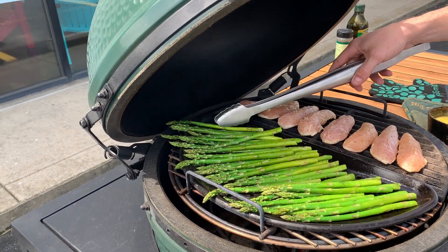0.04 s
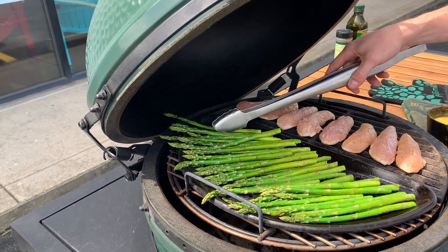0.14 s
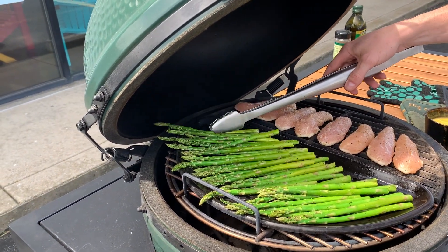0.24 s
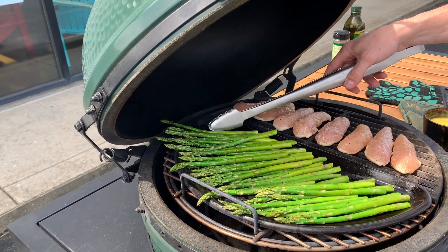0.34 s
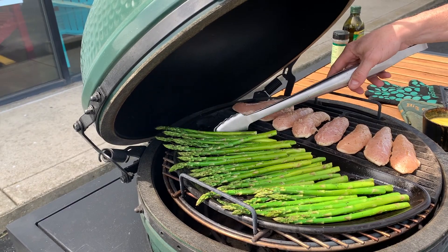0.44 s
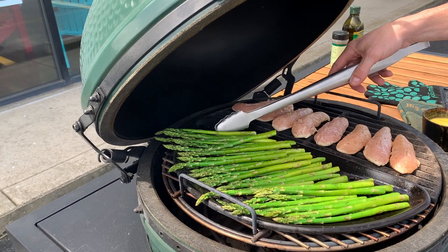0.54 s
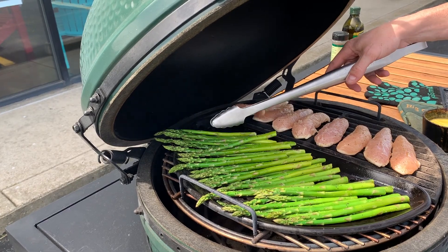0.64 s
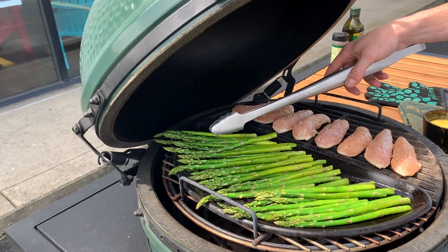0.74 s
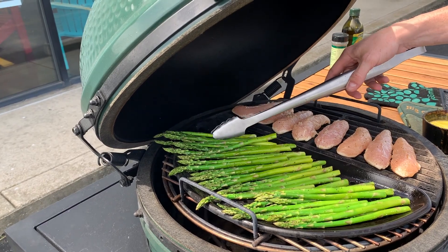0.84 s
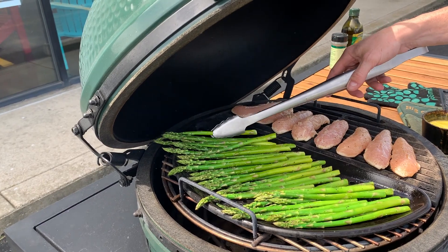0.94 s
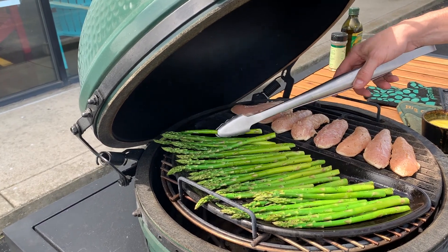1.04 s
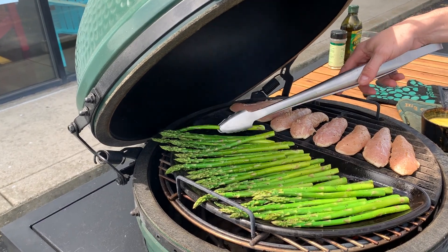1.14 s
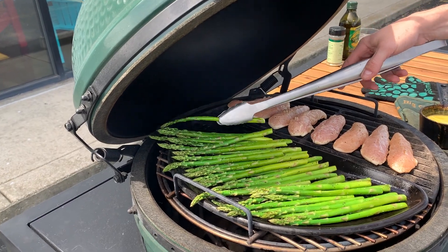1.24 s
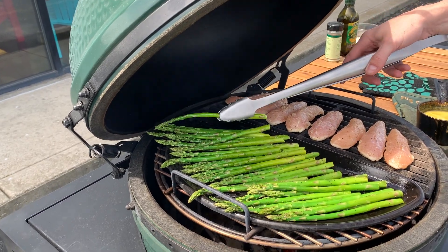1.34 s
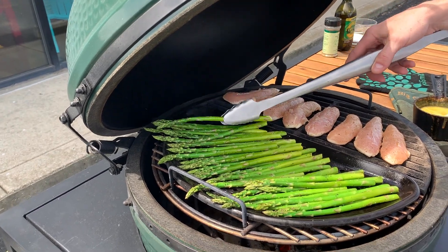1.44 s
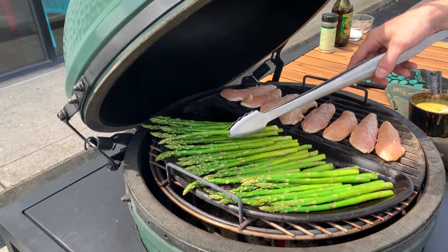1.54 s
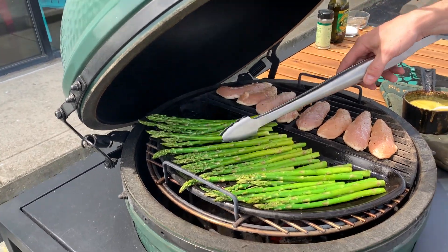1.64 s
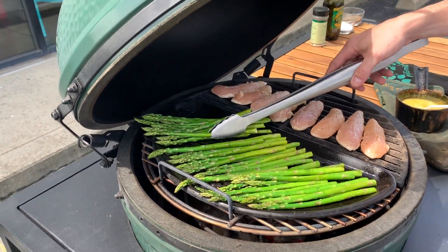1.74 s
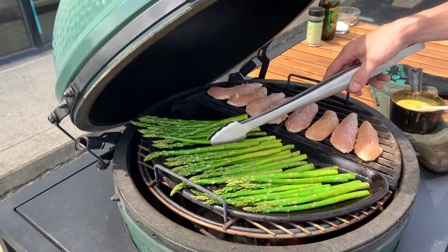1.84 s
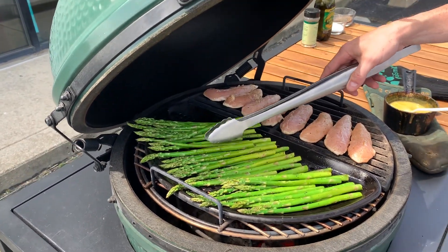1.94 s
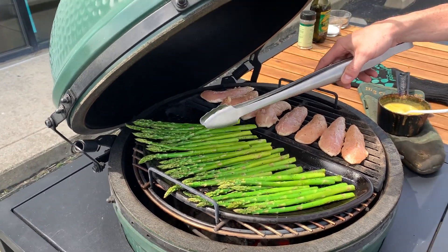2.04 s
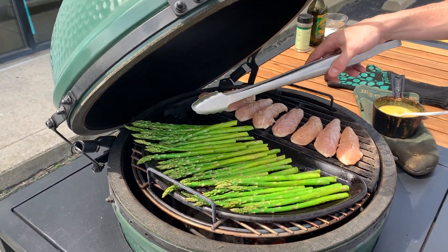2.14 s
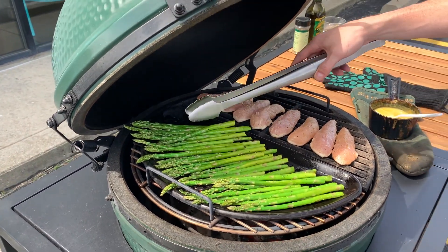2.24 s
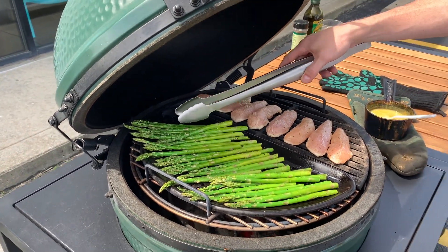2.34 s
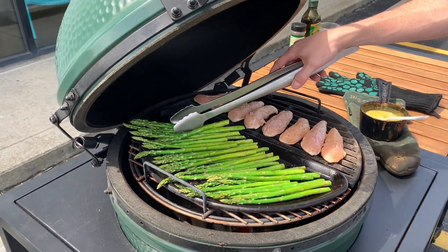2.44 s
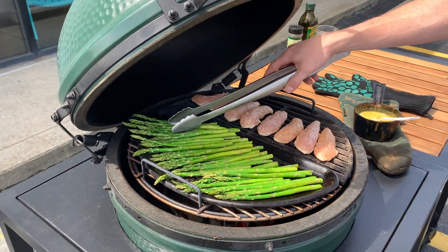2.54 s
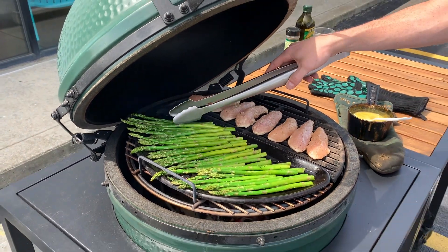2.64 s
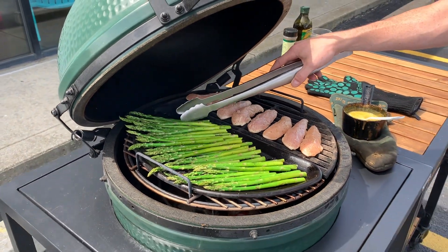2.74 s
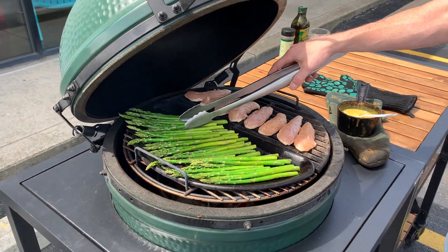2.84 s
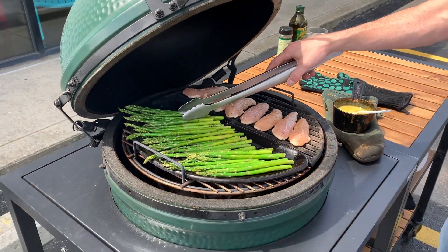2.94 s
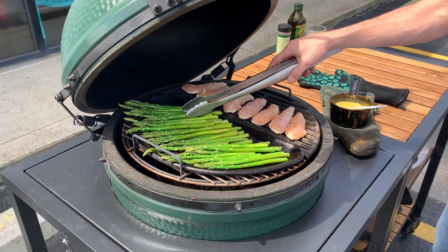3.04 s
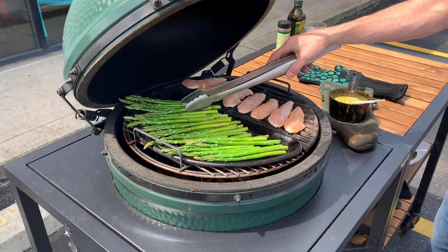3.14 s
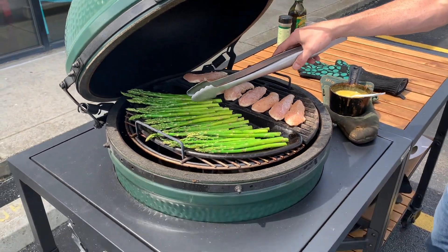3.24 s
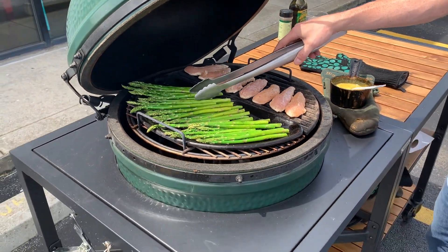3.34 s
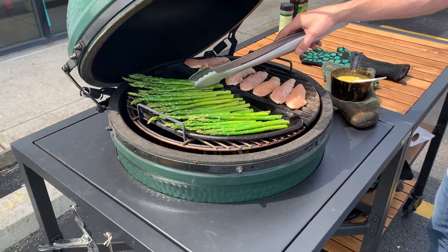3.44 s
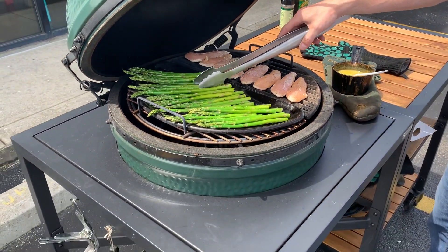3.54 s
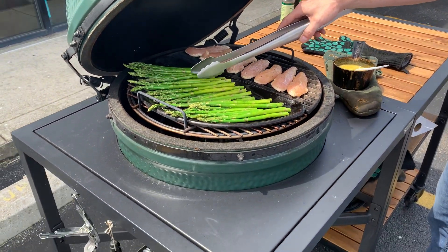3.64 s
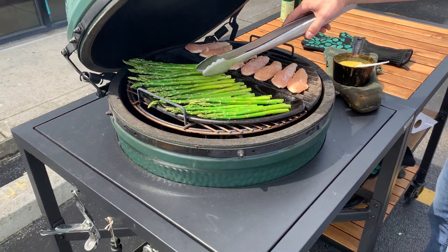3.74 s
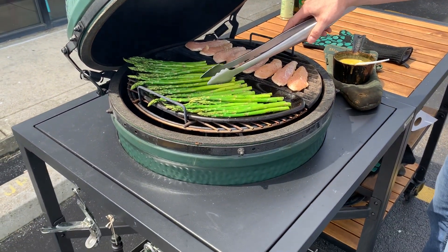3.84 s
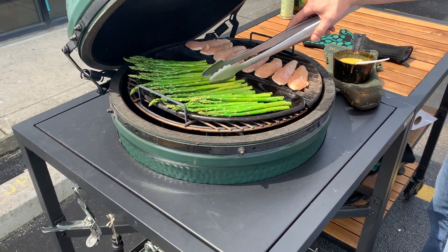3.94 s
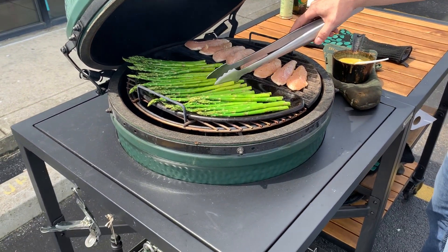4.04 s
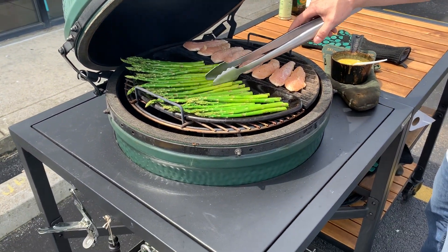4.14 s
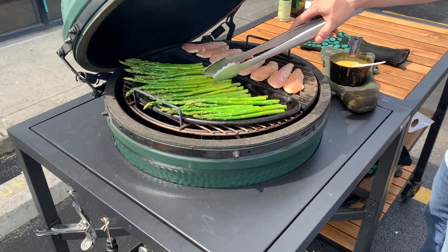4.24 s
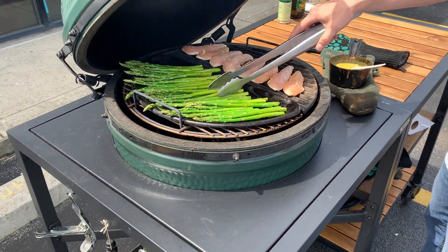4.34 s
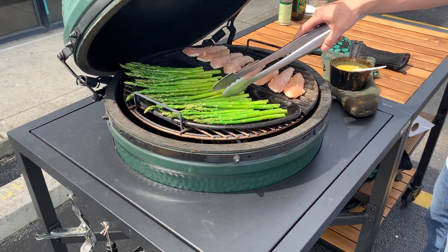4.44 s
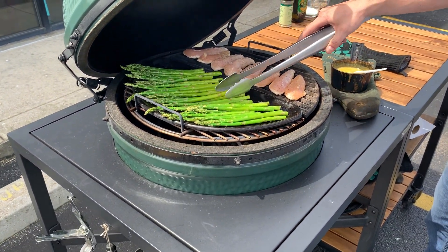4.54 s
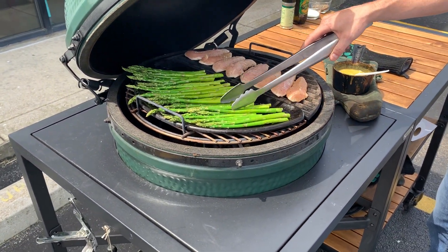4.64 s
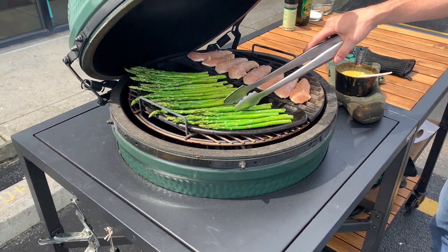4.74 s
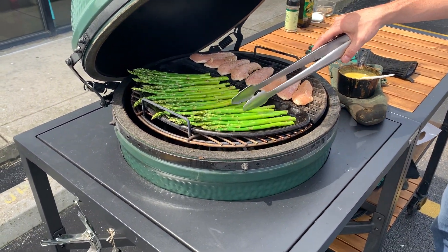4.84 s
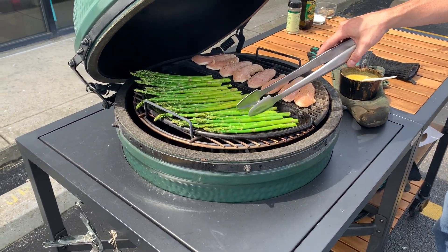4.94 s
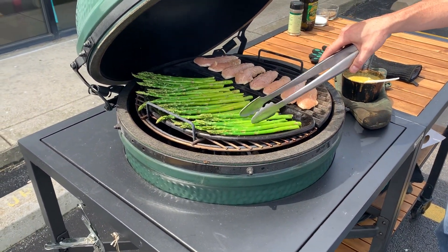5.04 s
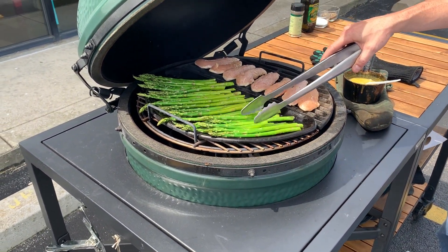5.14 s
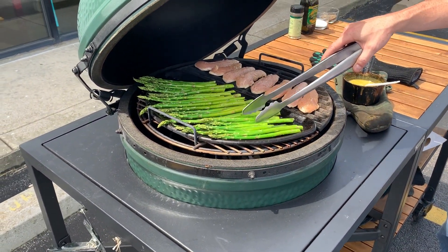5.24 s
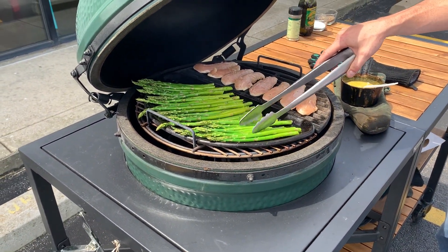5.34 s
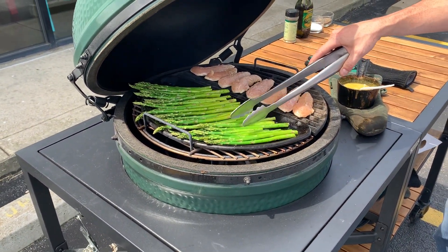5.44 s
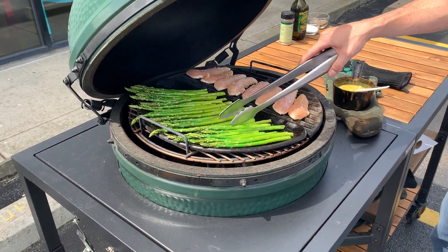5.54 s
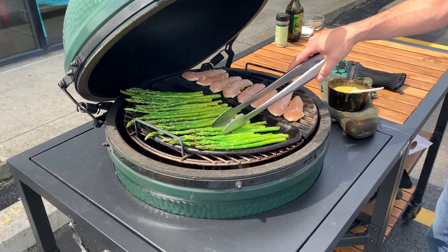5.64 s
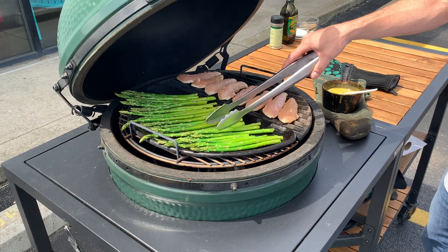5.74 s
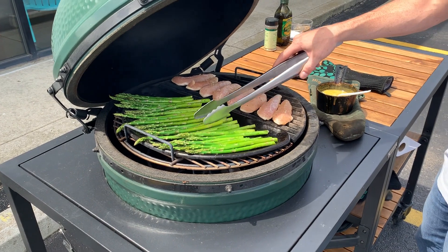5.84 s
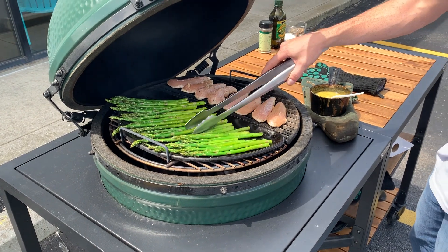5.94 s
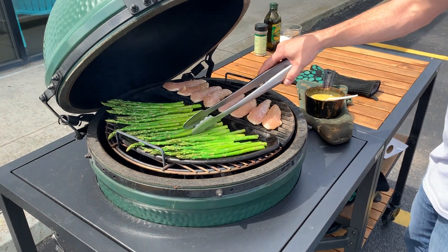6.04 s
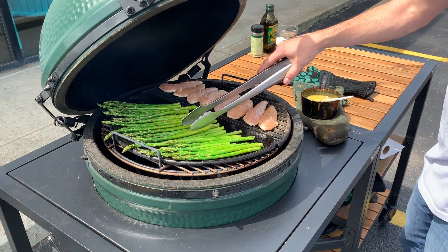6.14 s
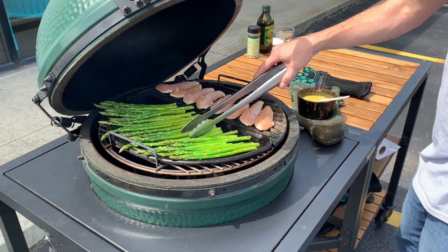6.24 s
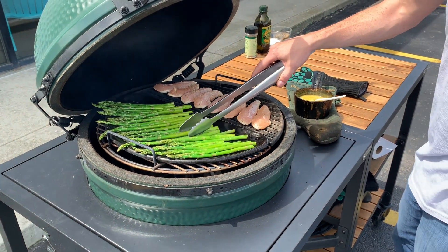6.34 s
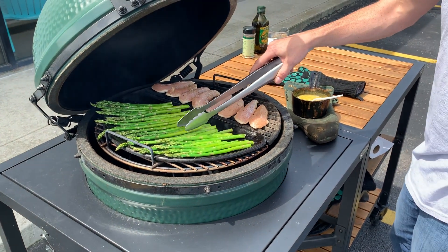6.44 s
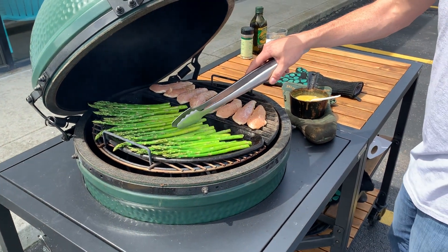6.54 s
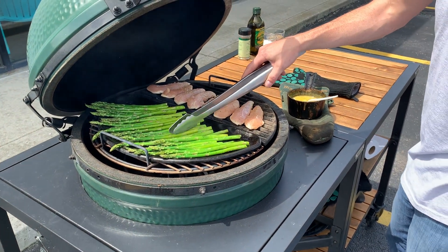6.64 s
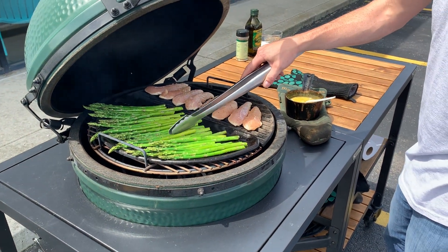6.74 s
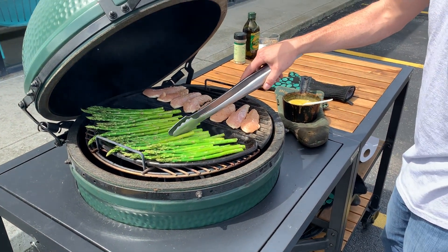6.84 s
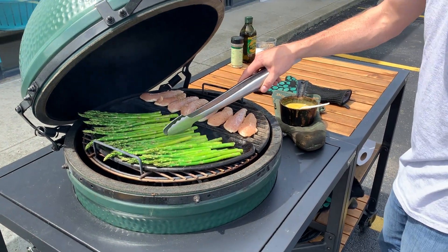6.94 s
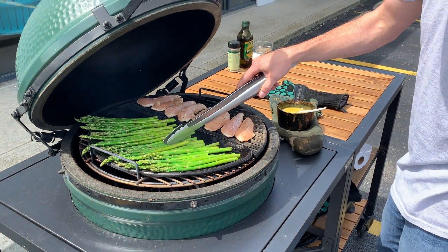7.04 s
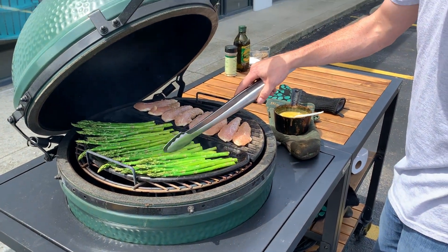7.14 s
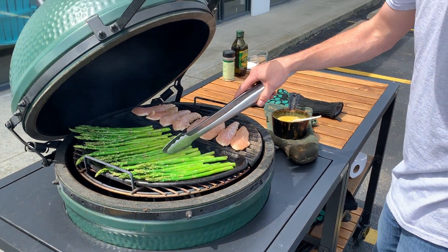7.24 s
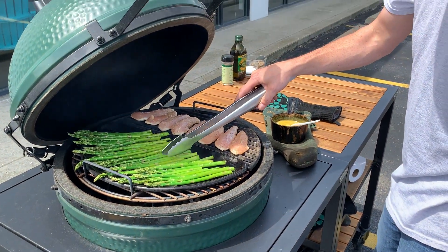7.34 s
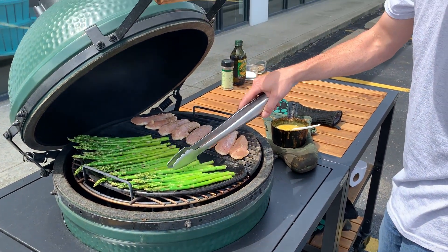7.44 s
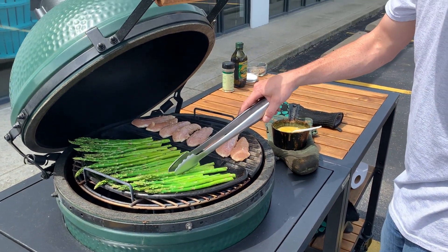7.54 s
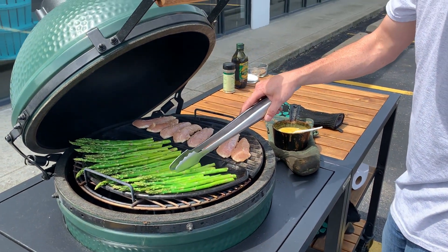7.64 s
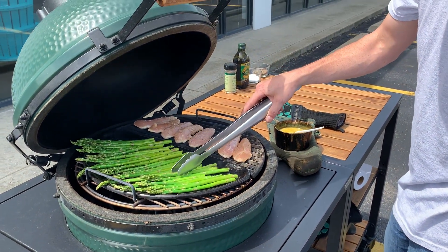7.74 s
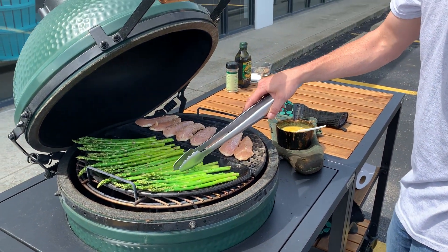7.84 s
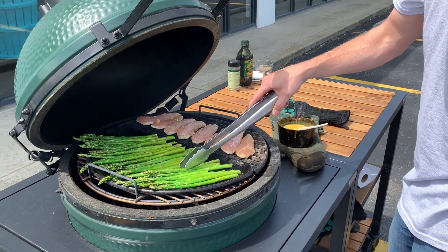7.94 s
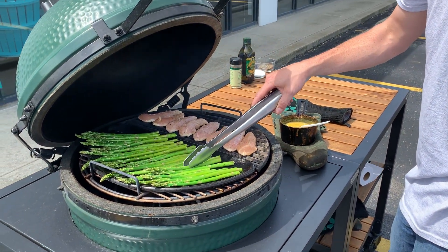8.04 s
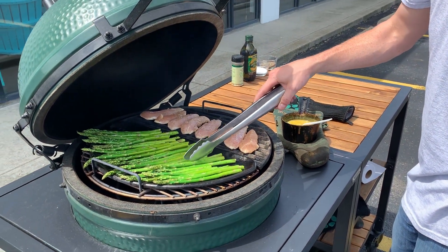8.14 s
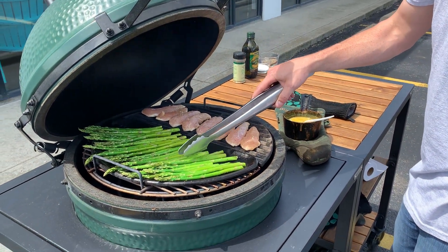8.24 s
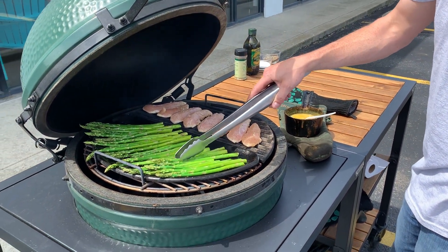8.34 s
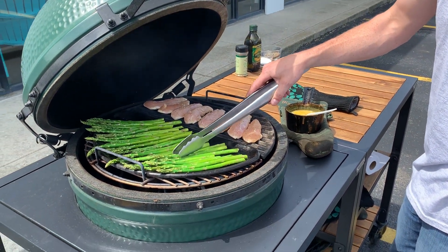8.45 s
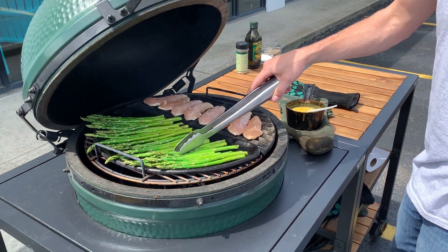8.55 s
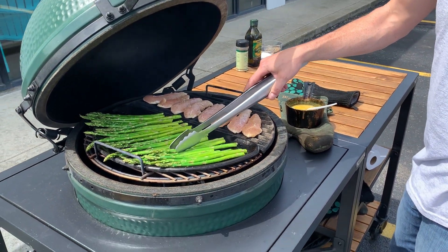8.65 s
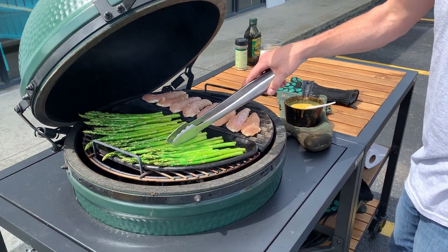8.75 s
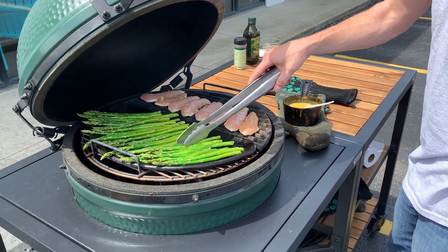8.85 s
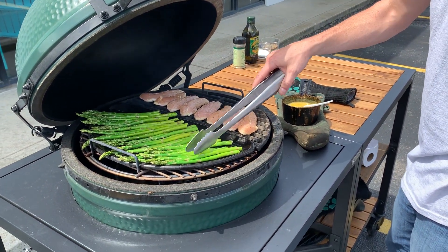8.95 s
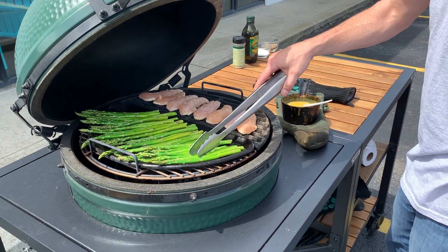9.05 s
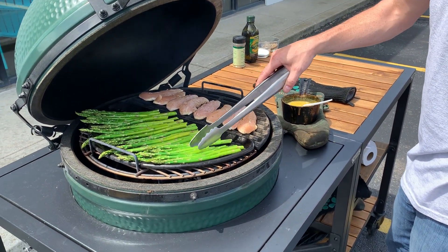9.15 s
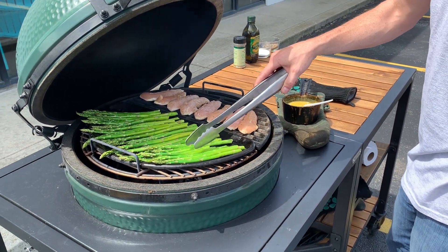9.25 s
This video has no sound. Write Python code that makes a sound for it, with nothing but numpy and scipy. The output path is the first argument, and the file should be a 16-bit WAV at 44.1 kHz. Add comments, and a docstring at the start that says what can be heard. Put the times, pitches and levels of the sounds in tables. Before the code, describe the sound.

Chicken and asparagus sizzle on an outdoor grill for about nine seconds, heard close and from one side: a bright, fluttering hiss with fine crackle and irregular sharp spits of fat. The sizzle is strongest at the very start and again around 4 to 5 seconds. At 0.4 seconds steel tongs clack sharply, bounce and ring briefly. Their tips scrape the grate lightly at about 0.5, 0.9 and 1.9 seconds, with a small metallic ring, then more faintly near 5.7, 6.8 and 7.2 seconds. Moved food gives a soft, dull knock at 5.7 seconds and a few quieter ones between 6.8 and 7.8. A big engine rumbles down the street, loudest in the first two seconds and fading steadily afterward. Faint traffic lies underneath, along with a distant compressor whose thin whine surfaces around 1 second and again from 8 to 9 seconds.

```python
"""Chicken and asparagus sizzle and spit on an outdoor grill while steel tongs clack and brush the grate.
Boiling juice hisses, steam bubbles snap, struck steel rings in its modes, and moved food knocks softly.
A big engine rumbles away down the street, its orders booming through exhaust and street resonances;
a compressor hums far off and the town murmurs.
Two microphone ports a few centimetres apart hear the grill from one side."""
import sys
import numpy as np
from scipy import signal
from scipy.fft import rfft, irfft, next_fast_len
from scipy.io import wavfile
from scipy.ndimage import uniform_filter1d, map_coordinates

SR = 44100
rng = np.random.default_rng(int(sys.argv[2]) if len(sys.argv) > 2 else 0)


def wrap_up_sound(samples):
    """Save the sound to the file named by the first command line argument, as 16-bit audio."""
    columns = np.atleast_2d(samples).T
    # keep every value between -1 and 1, then stretch to whole-number steps
    tamed = np.clip(columns, -1, 1)
    steps = np.round(tamed * 32767).astype(np.int16)
    wavfile.write(sys.argv[1], SR, steps)


N = 410130
TIME = np.arange(N) / SR

# bright colour of the sizzle, also lent to spatter, clack and scrape: (frequency [Hz], level [dB])
FIZZ = [(900, -16), (1800, -10.5), (2600, -14), (3500, -7.5), (5000, -10), (6300, -3), (8200, 0),
        (12000, 1), (14000, -1), (15800, 0.5)]
# the clack of the tongs and its bounces: (time [s], rattle level [dB], blow level [dB])
CLACKS = [(0.388, -4, 13), (0.414, -8, -10), (0.434, -18, -20), (0.446, -15.5, -12), (0.4744, -34, -16)]
# modes of the steel arms, lowest first: (frequency [Hz], width [Hz], level [dB])
TONG_MODES = [(2174, 10, 4), (2258, 4.5, 8), (2823, 40, -15), (3050, 50, -13), (3250, 50, -13),
              (3466, 25, -10), (3930, 70, -15), (4037, 20, -16), (4675, 30, -8), (5466, 40, -16),
              (5897, 80, -8), (6255, 40, -14), (6931, 40, -12), (7208, 80, -12), (7547, 40, -14),
              (8093, 120, -5), (8360, 160, -10), (9536, 120, -8), (10534, 120, -6), (11101, 25, 1),
              (11284, 120, -7), (12326, 130, -8), (13195, 110, -9), (14602, 150, -5)]
# the tips touch the grate: (time [s], length [s], scrape [dB], low ring [dB], high ring [dB])
BRUSHES = [(.504, 0.018, -21, -43.5, -42), (0.907, 0.022, -30.5, -48, -53), (1.852, .001, -26.5, -66, -63),
           (1.869, 0.019, -25, -38, -44), (5.735, 0.056, -40, -63, -50), (6.842, .002, -40, -59, -44),
           (7.224, 0.011, -34, -57, -65)]


def amp(db):
    """Gain of a level in dB."""
    return 10 ** (np.asarray(db) / 20)


def unit(x):
    """x at rms 1."""
    return x / np.sqrt(np.mean(x ** 2) + 1e-20)


def along(points, hz):
    """Reads (frequency, value) points on a log axis."""
    f, v = np.transpose(points)
    return np.interp(np.log(hz + 1), np.log(f + 1), v)


def curves(rows):
    """One value per sample for each column after the time."""
    s, *cols = np.transpose(rows)
    return [np.interp(TIME, s, c) for c in cols]


def wobble(rate):
    """A smooth random curve, rate knots a second."""
    return map_coordinates(rng.standard_normal(int(N * rate / SR) + 4), [TIME * rate])


def filtered(x, response):
    """x through a complex frequency response."""
    m = next_fast_len(N + SR // 2)
    return irfft(rfft(x, m) * response(np.fft.rfftfreq(m, 1 / SR)), m)[..., :N]


def resonance(f, centre_hz, width_hz):
    """Causal response of one mode."""
    return 1j * f * width_hz / (centre_hz ** 2 - f * f + 1j * f * width_hz)


def modes(table):
    """Response of a body with these (frequency, width, level) modes, alternating in polarity."""
    return lambda f: sum((-1) ** k * amp(db) * resonance(f, hz, width)
                         for k, (hz, width, db) in enumerate(table))


def spread(pair, likeness):
    """Mixes two unrelated signals into left and right of the given likeness."""
    angle = lambda f: np.arccos(np.clip(along(likeness, f), -1, 1)) / 2
    mid, side = filtered(pair, lambda f: np.array([np.cos(angle(f)), np.sin(angle(f))]))
    return np.array([mid + side, mid - side])


def patchy_noise(depth_db=1.9):
    """Two noises that share patches of random gain in time and frequency."""
    spectra = signal.stft(rng.standard_normal((2, N)), nperseg=512)[2]
    patches = uniform_filter1d(rng.standard_normal(spectra.shape[1:]), size=10, axis=0)
    patches = uniform_filter1d(patches, size=8, axis=1)
    return unit(signal.istft(spectra * amp(depth_db * unit(patches)), nperseg=512)[1][:, :N])


def bursts(s, db, t60):
    """Two noises that jump up at each time s and die away."""
    kicks = np.bincount(np.round(s * SR).astype(int), amp(db), N)
    return signal.lfilter([1], [1, -amp(-60 / (t60 * SR))], kicks) * rng.standard_normal((2, N))


def swelling(base_db, spells):
    """Gain of a base level plus spells that rise, hold and fall; their powers add."""
    power = sum(amp(2 * db) * np.exp(-2 * abs((TIME - s) / half) ** 3) for s, half, db in spells)
    return np.sqrt(amp(2 * base_db) + power)


def spells_of(table, key):
    """The (middle, half length, level) of each row whose third column lies near key."""
    return [(s, half, db) for s, half, k, db in table if abs(k / key - 1) < 1 / 32]


def pops(s, db, hz, crunch_db, spatter_db=-20):
    """Steam bubbles: a snap of about a cycle, a low crunch, then spatter; row two comes by stray paths."""
    t = np.arange(-20, 20) / SR
    snaps, chance = np.zeros((2, N)), rng.random((len(s), 3))
    window = np.exp(-.5 * (t / .00007) ** 2)
    for row in range(2):
        wave = amp(db)[:, None] * window * np.cos(2 * np.pi * (hz[:, None] * t + chance[:, [row]]))
        centre = np.round((s + row * .0006 * chance[:, 2]) * SR).astype(int)
        samples = np.clip(centre[:, None] + np.arange(len(t)) - len(t) // 2, 0, N - 1)
        snaps[row] = np.bincount(samples.ravel(), wave.ravel(), N)
    crunch = filtered(bursts(s, db + crunch_db, t60=0.036), lambda f: resonance(f, 2100, 9400) ** 2)
    spatter = filtered(bursts(s, db + spatter_db, t60=0.04), lambda f: amp(along(FIZZ, f)))
    return snaps + amp(1) * crunch + spatter


def sizzle(bubbles=3500, crackle_db=-5, flurry_above_hz=4000):
    """Hiss of boiling juice with a crackle of small bubbles; flurries stir the crackle and the treble."""
    # ride of the sizzle: (time [s], level [dB], treble tilt [dB per octave, held within 3 either way])
    ride = [(0, -31, 11), (.2, -36.5, 2), (.6, -40, -1.5), (1.1, -36.5, 1), (1.3, -37.5, 4),
            (1.8, -36, -1.5), (2.1, -40, -4), (2.3, -34, 2), (2.42, -36, 1.5), (2.48, -40, -0.5),
            (2.85, -38.5, 1), (3.3, -36.5, 0.5), (3.75, -37, 1), (4.4, -31, 4.5), (4.63, -36.5, 1),
            (4.85, -32.5, 2), (5.7, -35, 0), (6.1, -38, 0.5), (6.7, -36.5, 2), (7.5, -38, 1.5),
            (8.1, -37, 1), (8.3, -40, 1.5), (8.7, -36.5, 1.5), (9.3, -39.5, 2)]
    level_db, tilt_db = curves(ride)
    flurry_db = wobble(55)
    when, size, pitch = rng.random((bubbles, 3)).T
    s = when * (N - 1) / SR
    size_db = 1.6 * flurry_db[(s * SR).astype(int)] - 3.6 * np.log(size + .02)
    crackle = unit(pops(s, size_db, 8000 + 7800 * pitch, crunch_db=-35, spatter_db=-24.5))
    calm = patchy_noise()
    hiss = calm + filtered(calm * (amp(flurry_db) - 1), lambda f: f ** 4 / (f ** 4 + flurry_above_hz ** 4))
    dull, bright = [unit(filtered(hiss, lambda f: amp(along(FIZZ, f) + tilt * np.log2(f / 1e4 + .01))))
                    for tilt in (-3, 3)]
    brightness = np.clip(.5 + tilt_db / 6, 0, 1)
    hiss = unit((1 - brightness) * dull + brightness * bright)
    return amp(level_db) * unit(hiss + amp(crackle_db) * crackle)


def engine(rough=.5, rough_per_s=.08, drift_db=2, scattered_db=-3):
    """Drifting engine orders, ever noisier with distance, sound through the booms; a few carry clearly."""
    # engine speed as it drives off: (time [s], cycle rate [Hz])
    speed = [(0, 10.08), (.8, 10.1), (1.6, 10.23), (2.5, 10.44), (4.2, 10.65), (6, 10.8), (7.3, 10.96),
             (9.3, 11.15)]
    # orders that the exhaust lifts or cuts: (order [multiple], gain [dB])
    exhaust_trims = [(15, 4), (17, -5.5), (22, -4.5)]
    # booms of exhaust and street: (frequency [Hz], width [Hz], starting level [dB], fade [dB/s])
    booms = [(53.9, 15, -47.5, 0.4), (78.9, 13, -43.5, 1), (113.7, 13.1, -38.5, 2), (129.3, 11.3, -46.5, 2),
             (162.1, 17, -43.5, 3.45), (176, 7.4, -51, 4), (180.5, 16, -45.5, 1.5), (145, 132, -50.5, 0.14),
             (195.6, 13, -43, 3), (235.8, 14.5, -43, 2), (268.4, 15.6, -50, 2.76), (295.7, 53, -48.5, 2),
             (378, 62, -46, 4)]
    # a boom swells for a while: (middle [s], half length [s], boom frequency [Hz], level [dB]); a row acts only
    # on a boom within 1/32 of its frequency, so the rows at 52 Hz find none and stay silent
    swells = [(-0.5, 0.51, 52, -34.5), (1, 0.6, 52, -33.5), (-1.4, 0.29, 80, -31), (1.17, 1.8, 80, -35.5),
              (0, 0.39, 114, -27), (2.1, 0.3, 114, -35), (3.5, 0.38, 114, -37.5), (3, 0.93, 114, -32.5),
              (4, 0.36, 114, -36.5), (8.5, 0.17, 114, -49), (0.46, 0.86, 132, -32.5),
              (0.97, 0.52, 132, -28.5), (5, 0.41, 132, -39.5), (2, 0.24, 183, -38.5),
              (2.5, 0.55, 167, -44.5), (1, 0.44, 183, -42), (1.1, 0.56, 266, -43.5),
              (0.57, 0.22, 238, -35.5), (1.24, 0.36, 238, -39.5), (3, 0.21, 238, -49),
              (1.4, 0.63, 380, -45.5)]
    # an order stands out as a tone: (middle [s], half length [s], order [multiple], level [dB])
    clear_orders = [(0.56, 1.07, 13, -32.5), (.7, 0.25, 23, -48), (1.64, 0.4, 23, -41.5),
                    (5.04, 0.87, 16, -44.5), (6.94, 1.1, 16, -51.5)]
    phase = 2 * np.pi * np.cumsum(curves(speed)[0]) / SR
    trim_db = {round(k): db for k, db in exhaust_trims}
    orders = {k: amp(drift_db * wobble(1.42)) * np.sin(k * phase + rng.uniform(0, 2 * np.pi))
              for k in range(3, 45)}
    drone = unit(sum(amp(trim_db.get(k, 0)) * tone for k, tone in orders.items()))
    # the noise rises with frequency, so the upper booms are rougher
    noise = filtered(rng.standard_normal((2, N)), lambda f: (f > 35) * (f < 450) * np.sqrt(f + 60))
    roughness = rough + rough_per_s * TIME
    drive = np.array([drone + roughness * unit(noise[0]), amp(scattered_db) * unit(noise[1])])
    out = np.zeros((2, N))
    for hz, width, db, fade_db in booms:
        boom = filtered(drive, lambda f: abs(resonance(f, hz, width)) ** 2)
        out += swelling(db - fade_db * TIME, spells_of(swells, hz)) * boom / np.std(boom[0])
    for s, half, k, db in clear_orders:
        out[0] += swelling(-120, [(s, half, db)]) * np.sqrt(2) * orders[round(k)]
    return out


def street(far_db=-54, near_boost_db=13, leaving_s=2.43, drift_db=.7):
    """The engine and a traffic murmur that sinks as it leaves, alike on both sides mostly in the bass."""
    # colour of the town's murmur: (frequency [Hz], level [dB])
    colour = [(250, -70), (450, 0), (750, 1), (1100, -6), (2000, -9), (2600, -15.5), (4000, -9),
              (8000, -16.5)]
    # how alike the street is at the two ports: (frequency [Hz], likeness [0-1])
    likeness = [(50, 0.8), (200, 0.69), (380, 0.37), (700, 0.43), (2500, 0.29)]
    # the street reaches the right port late: (frequency [Hz], phase lag [rad])
    right_lag = [(450, 0), (950, 2), (2400, 2.4)]
    murmur = unit(filtered(patchy_noise(), lambda f: amp(along(colour, f))))
    murmur_db = far_db + near_boost_db * np.exp(-TIME / leaving_s) + drift_db * wobble(2.416)
    pair = spread(engine() + amp(murmur_db) * murmur, likeness)
    return filtered(pair, lambda f: np.exp(.5j * along(right_lag, f) * np.array([[1], [-1]])))


def compressor(rotor_hz=124.4, waver_db=2.2, left_lead_rad=1.6):
    """Steady orders of a far rotor; the air makes them waver, a little differently on each side."""
    # the rotor's faint hum: (order [multiple], level [dB])
    hum = [(7, -81), (8, -72.5), (9, -75), (11, -85), (16, -74.5)]
    # spells when an order carries as a whine: (middle [s], half length [s], order [multiple], level [dB])
    whines = [(1, 0.56, 8, -62.5), (3.3, 0.4, 8, -80), (3.8, 0.67, 9, -65.5), (5.55, 0.43, 8, -71),
              (6.65, 0.45, 9, -67), (7.85, 0.27, 8, -59), (8.45, 0.67, 8, -64), (9.3, 0.19, 8, -59),
              (8, 0.18, 9, -72), (9.1, 0.5, 9, -66)]
    out = np.zeros((2, N))
    for k, db in hum:
        phase = 2 * np.pi * round(k) * rotor_hz * TIME + 1.27 * wobble(1.476)
        sides = [amp(side_db + waver_db * wobble(7.7)) * np.sin(phase + lead + 0.55 * wobble(8.7))
                 for side_db, lead in ((3.5, left_lead_rad), (0.5, 0))]
        out += swelling(db, spells_of(whines, k)) * np.sqrt(2) * np.array(sides)
    return out


def spits(count=70, small_db=-25, small_range_db=6, small_crunch_db=-35):
    """Fat spits in loud single pops, with smaller ones at random between them."""
    # the loud spits: (time [s], level [dB], pitch [Hz], low crunch against the level [dB])
    loud = [(0.0976, -15, 12100, -32), (0.653, -12, 10100, -20), (0.7137, -24, 8900, -23),
            (0.759, -22, 9000, -18), (0.8548, -17, 8700, -14), (1.095, -8, 12200, -16.5),
            (1.1376, -12.5, 11800, -31), (1.3293, -16, 11100, -21), (1.4332, -14, 10100, -35),
            (1.44, -8.5, 10900, -20), (1.5257, -16, 12400, -37), (1.557, -15, 10100, -27),
            (1.6875, -17.5, 11300, -23), (2.1315, -19, 12900, -20), (2.2159, -15.5, 12600, -36),
            (2.308, -12.5, 10400, -27), (2.3978, -15, 10800, -33), (2.6654, -13.5, 8850, -18),
            (3.286, -13.5, 10300, -27), (3.3535, -18, 11000, -25), (3.918, -20, 11000, -35),
            (3.975, -22, 13600, -36), (4.028, -24, 12100, -32), (4.101, -20, 13200, -35),
            (4.1248, -21, 11900, -33), (4.1713, -9, 14000, -42), (4.1877, -24, 13000, -40),
            (4.1895, -3.5, 14800, -56), (4.199, -11, 14200, -50), (4.2152, -16, 13500, -40),
            (4.2531, -21, 12900, -34), (4.274, -17, 12500, -40), (4.315, -19, 11500, -35.5),
            (4.355, -12, 10000, -35), (4.39, -25, 11000, -35), (4.691, -18, 9300, -39),
            (4.7744, -17, 11400, -15.5), (4.873, -15, 11000, -35), (4.927, -15.5, 8900, -25),
            (5.016, -25, 11000, -35), (5.072, -20, 10900, -30), (5.1125, -28, 10000, -33),
            (5.195, -17.5, 11000, -35), (5.2409, -13, 8550, -32), (5.3308, -16.5, 8800, -29),
            (5.4327, -18, 10000, -18), (5.601, -22.5, 9000, -11.5), (6.1278, -13, 10400, -37),
            (6.2919, -17.5, 10800, -17), (6.5399, -19, 10900, -36), (6.765, -12.5, 12200, -36),
            (7.7884, -21, 11700, -18), (7.9641, -16, 10700, -27), (8.064, -16, 9600, -24),
            (8.086, -16, 11700, -34), (8.1455, -19, 9600, -32), (8.1664, -9, 8800, -19.5),
            (8.1684, -11, 9500, -30), (8.443, -19, 11000, -20), (8.522, -17, 11000, -33),
            (8.563, -19, 12500, -33), (8.69, -17, 10300, -35), (8.9194, -14, 11600, -37),
            (8.9308, -14, 9800, -31), (9.1874, -12, 9500, -25), (9.2204, -16, 12700, -32)]
    when, size, pitch, crunch = rng.random((count, 4)).T
    small = [when * (N - 1) / SR, small_db + small_range_db * (size - .5),
             8800 + 3800 * pitch, small_crunch_db + 18 * (crunch - .5)]
    return pops(*np.hstack([np.transpose(loud), small]))


def arm_damping(decay_s=.012):
    """Gain that chokes the arms of the tongs once the tips first touch the grate."""
    return np.exp(-np.clip(TIME - BRUSHES[0][0], 0, None) / decay_s)


def tongs_clack(rise_s=.0015, t60=0.057, low_cut_hz=2500):
    """The arms clack and bounce; each contact is a blow and a short rattle that ring their upper modes."""
    envelope = np.zeros(N)
    for s, db, _ in CLACKS:
        envelope += np.clip((TIME - s) / rise_s, 0, 1) * amp(db - 60 * np.clip(TIME - s, 0, 1) / t60)
    blows = np.bincount([round(s * SR) for s, *_ in CLACKS], [amp(db) for *_, db in CLACKS], N)
    rattle = filtered(envelope * rng.standard_normal((2, N)), lambda f: 1j * f / (low_cut_hz + 1j * f))
    contact = rattle + blows
    ring = filtered(contact, modes(TONG_MODES[2:]))
    click = filtered(contact, lambda f: amp(0.88 * along(FIZZ, f)))
    return (amp(11.5) * ring + amp(-9) * click) * arm_damping()


def tongs_ring(boost_db=12):
    """The first blow rings the two lowest modes, almost in step at both ports and louder on the right."""
    s, _, db = CLACKS[0]
    blow = amp(db + boost_db) * (np.arange(N) == round(s * SR))
    ring = filtered([blow, np.roll(blow, shift=3)], modes(TONG_MODES[:2]))
    return ring * amp([[-1.4], [1.4]]) * arm_damping()


def grate_brushes(t60=0.064):
    """The tips of the tongs scrape grittily over the grate, which rings on."""
    # low and high modes of the grate: (frequency [Hz], width [Hz], level [dB])
    low_modes = [(297, 38, -16), (1403, 9.7, 8.5), (1530, 8.8, 0.5)]
    high_modes = [(2020, 110, -4), (4300, 52, -14), (6850, 400, -11)]
    strokes = np.zeros((3, N))
    for s, length, *levels_db in BRUSHES:
        envelope = (TIME > s) * amp(-60 * np.clip(TIME - s - length, 0, 1) / t60)
        strokes += amp(levels_db)[:, None] * envelope
    friction, low_drive, high_drive = strokes[:, None] * rng.standard_normal((3, 2, N))
    grit = 0.68 + 0.31 * amp(1.9 * wobble(1000))
    scrape = filtered(friction * grit, lambda f: amp(0.51 * along(FIZZ, f)))
    ring = filtered(low_drive, modes(low_modes)) + filtered(high_drive, modes(high_modes))
    return scrape + amp(24.5) * ring


def food_knocks(body_t60=0.036, tick_t60=0.0045, tick_hz=1900):
    """Moved food knocks softly on the right: a quickly damped resonance with a tick on top."""
    # the dull knocks: (time [s], level [dB], pitch [Hz])
    knocks = [(5.745, -27, 288), (6.8458, -38, 474), (7.405, -46, 1500), (7.537, -43, 770),
              (7.756, -39.5, 520)]
    out, t = np.zeros(N), np.arange(SR // 25) / SR
    tick = .5 * np.sin(2 * np.pi * tick_hz * t) * amp(-60 * t / tick_t60)
    for s, db, hz in knocks:
        body = np.sin(2 * np.pi * hz * t) * amp(-60 * t / body_t60)
        out[round(s * SR):][:len(t)] += amp(db) * (body + tick)
    return out * amp([[-2], [2]])


def scene(left_lag_s=1 / 4850, in_step_below_hz=1250):
    """The grill's treble reaches the left port a little late; the street comes from all around."""
    # how alike the grill is at the two ports: (frequency [Hz], likeness [0-1])
    likeness = [(1500, .1), (5500, .2), (6500, .5), (8000, .88), (16000, .88)]
    grill = spread(sizzle() + spits() + tongs_clack() + grate_brushes(), likeness)
    lag_rad = lambda f: 2 * np.pi * left_lag_s * np.clip(f - in_step_below_hz, 0, None)
    grill = filtered(grill, lambda f: np.exp(-.5j * lag_rad(f) * np.array([[1], [-1]])))
    return grill + tongs_ring() + food_knocks() + street() + compressor()


def record(dry, top_hz=15750):
    """The ports lean left or right by frequency; nothing passes above the band limit."""
    # balance of the ports: (frequency [Hz], left minus right [dB])
    balance = [(60, 0), (130, 0.5), (290, -1), (640, 3), (1410, 0.2), (3100, -1.6), (6820, -1.4),
               (15000, 0.9)]
    return filtered(dry, lambda f: amp(along(balance, f) * np.array([[.5], [-.5]])) * (f < top_hz))


dry = scene()
out = record(dry)
wrap_up_sound(out)
```